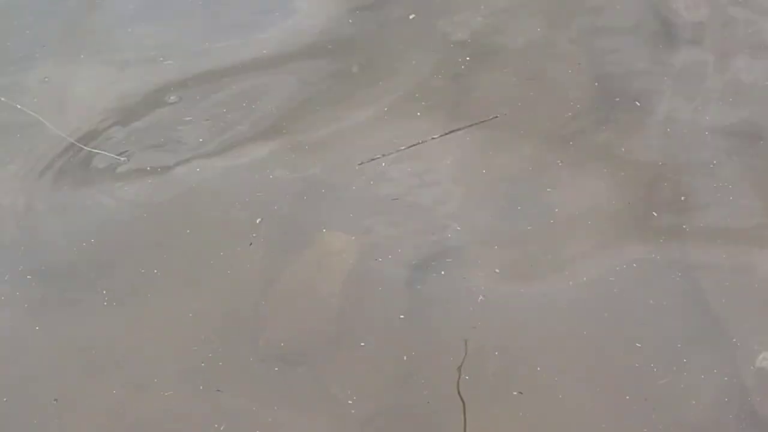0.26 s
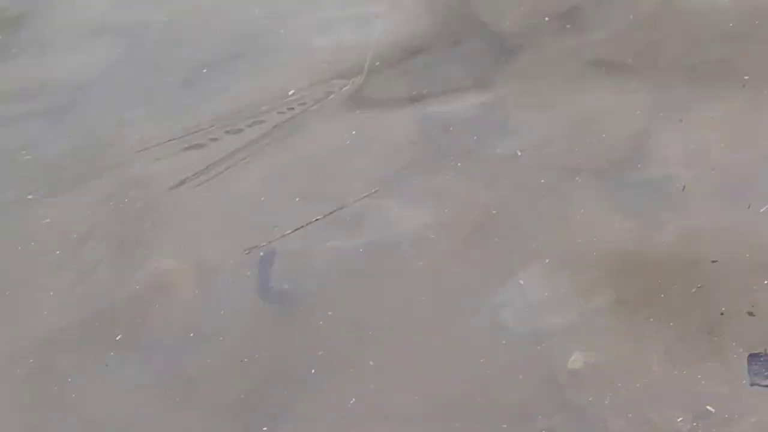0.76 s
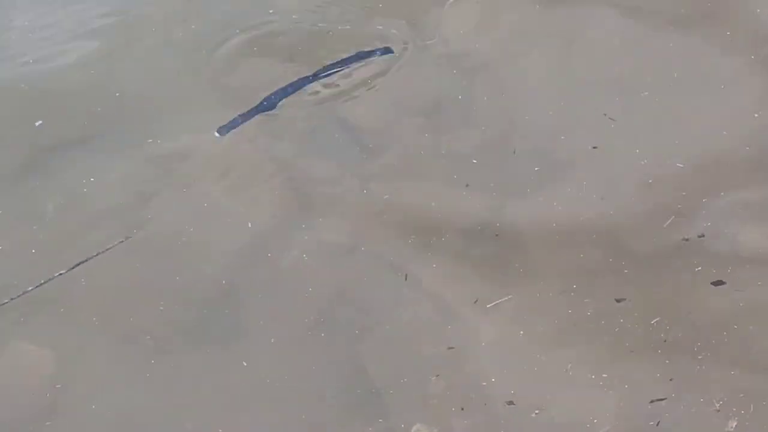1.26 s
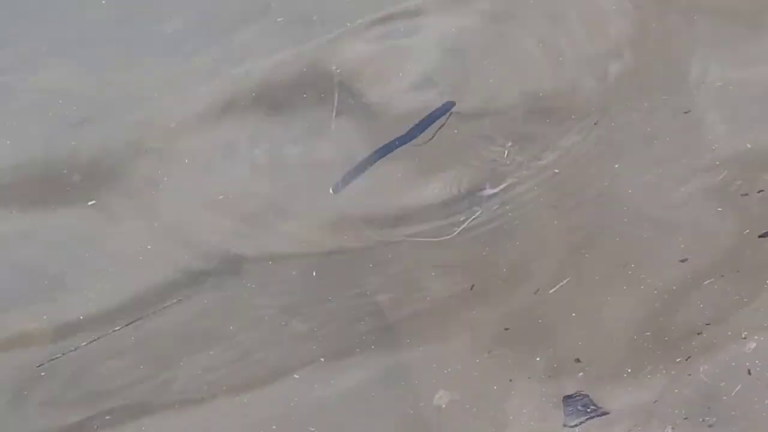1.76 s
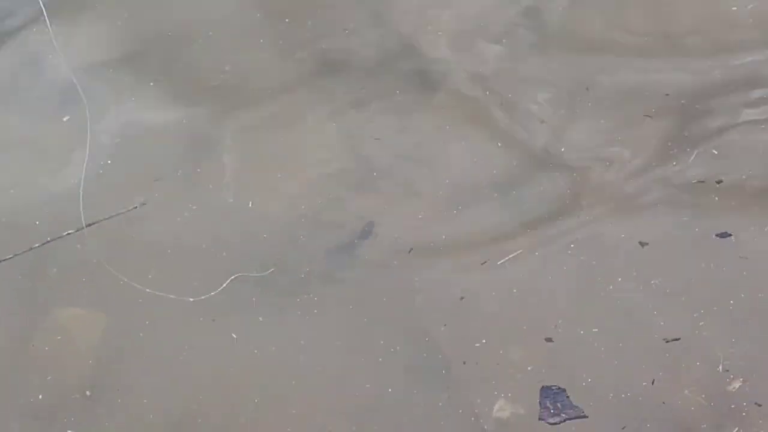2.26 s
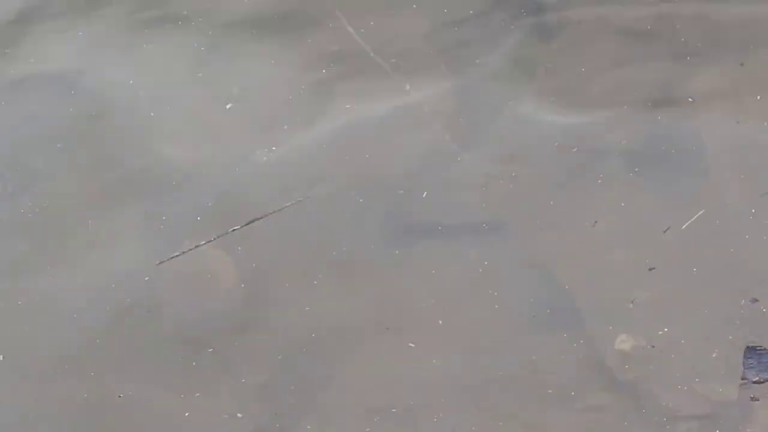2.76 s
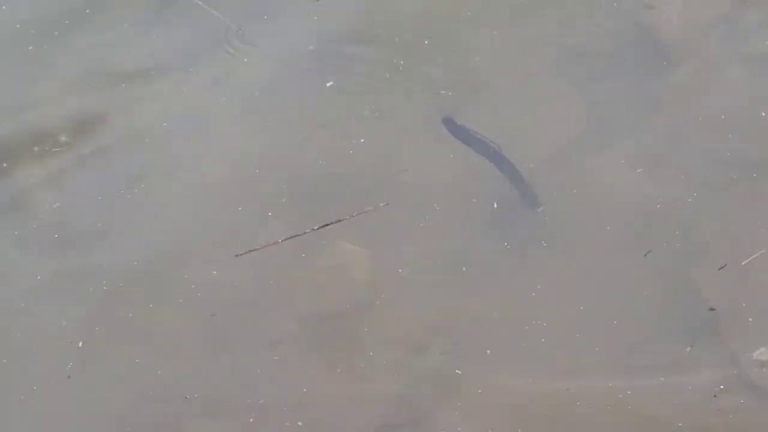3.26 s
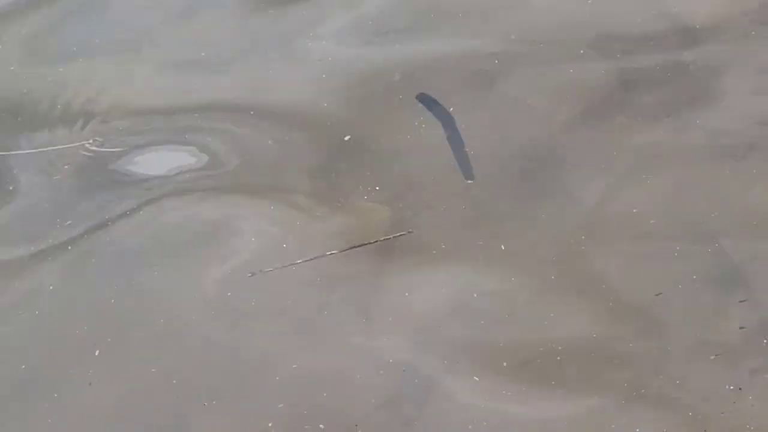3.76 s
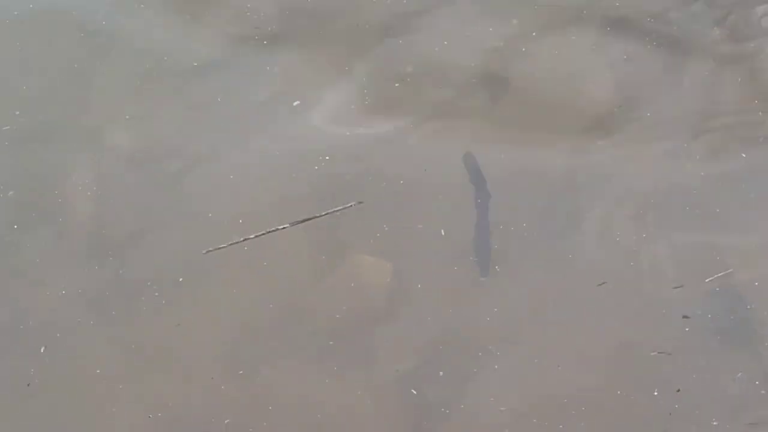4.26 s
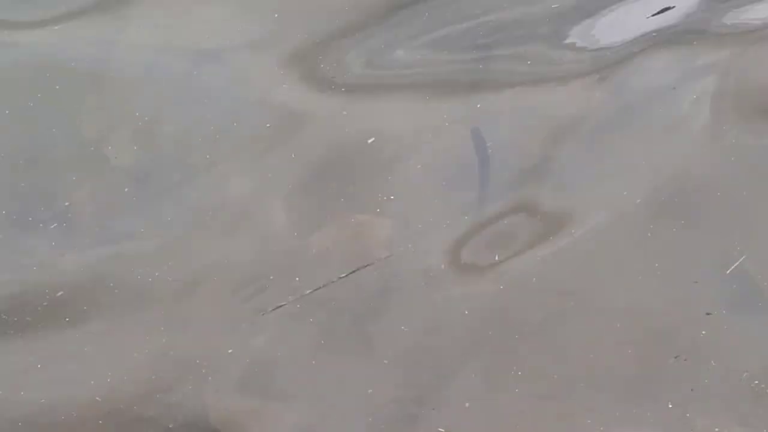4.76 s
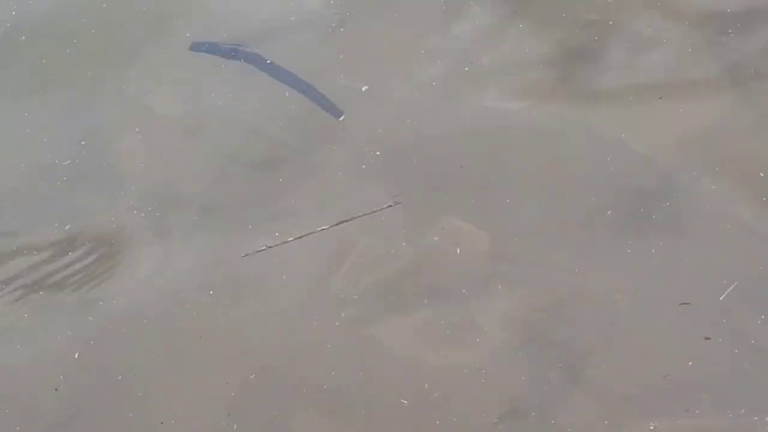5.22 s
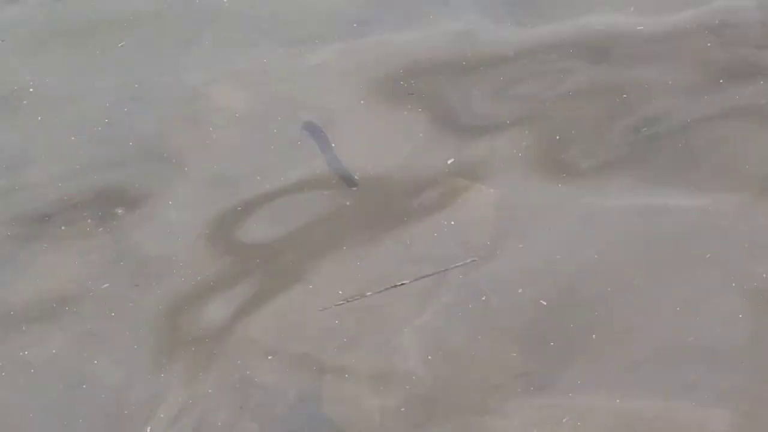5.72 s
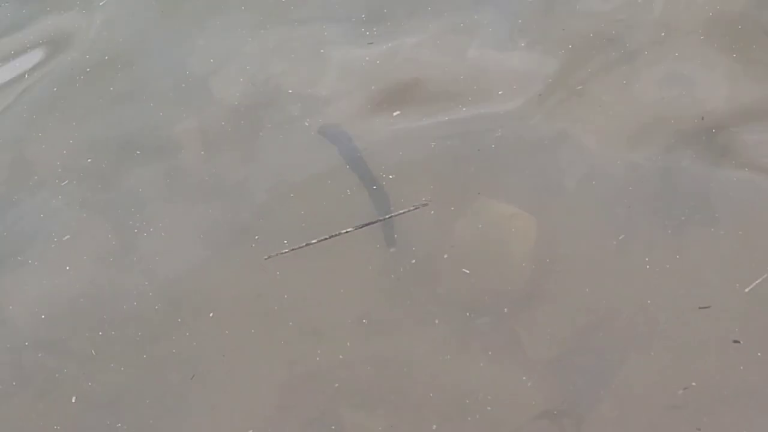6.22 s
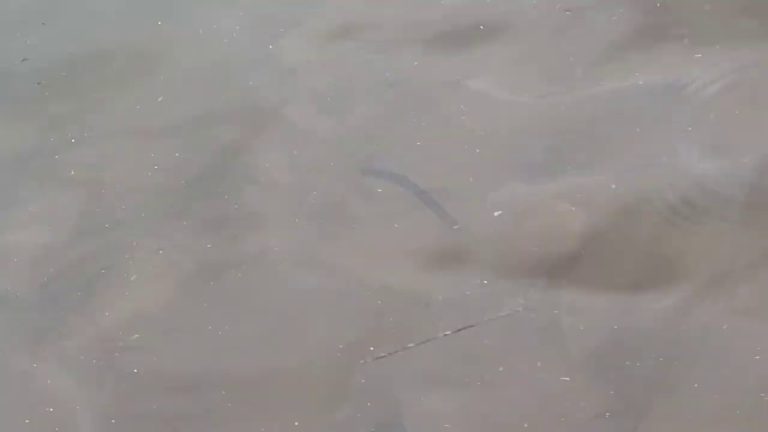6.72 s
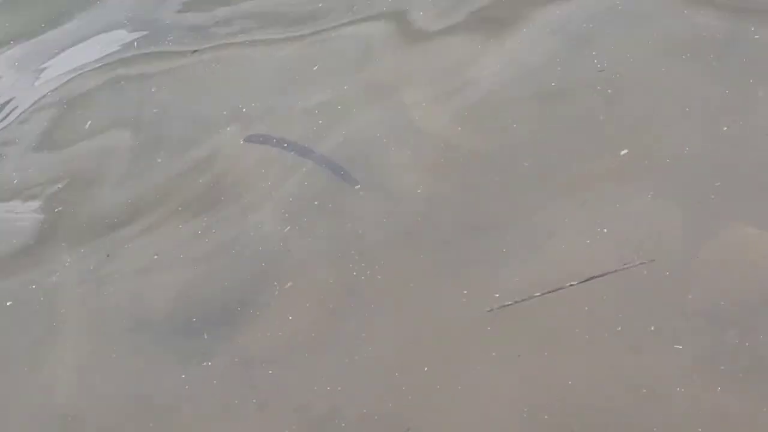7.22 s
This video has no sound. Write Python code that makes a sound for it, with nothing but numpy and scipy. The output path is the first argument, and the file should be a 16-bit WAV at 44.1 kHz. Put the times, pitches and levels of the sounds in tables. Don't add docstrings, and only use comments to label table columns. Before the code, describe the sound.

Shallow water laps irregularly near the microphone: round bubble plops, small wet drips and crisp splash ticks, separated by near-quiet lulls. Wind rumbles in short uneven lumps, different in left and right. A small bird with a light open-air echo chirps at first, rests, then gives five slow-spaced descending whistles and a quick closing phrase. Two stronger splashes stand out in the second half.

```python
import sys
import numpy as np
from scipy import signal
from scipy.fft import rfft, irfft, next_fast_len
from scipy.io import wavfile
from scipy.ndimage import uniform_filter1d

SR = 44100
rng = np.random.default_rng(int(sys.argv[2]) if len(sys.argv) > 2 else 0)


def to_linear_factor(level_db):
    exponent = np.asarray(level_db, float) / 20
    return 10 ** exponent


def persist_wave(psi):
    counts = np.round(np.clip(psi, -1, 1) * 32767).astype(np.int16)
    wavfile.write(sys.argv[1], SR, np.atleast_2d(counts).T)


N = 330044

# (time [s], gurgle level [dB], foam level [dB])
SURGES = [(0.0, -55.5, -64), (0.23, -68, -76.5), (0.44, -81, -73.5), (0.58, -65.5, -77), (0.79, -65.5, -72),
          (1.08, -60, -61.5), (1.27, -60, -67), (1.5, -71.5, -73), (1.67, -83.5, -82.5), (1.89, -70, -70),
          (2.04, -58.5, -63), (2.15, -59, -66), (2.46, -68, -76), (2.67, -72, -78), (2.91, -65, -72),
          (3.1, -56.5, -61.5), (3.27, -66, -69.5), (3.48, -73.5, -82.5), (3.71, -83.5, -78.5),
          (3.83, -70.5, -75), (4.08, -59.5, -66), (4.19, -64, -71.5), (4.35, -65, -76.5), (4.54, -83, -82),
          (4.77, -73.5, -84), (4.89, -57.5, -65.5), (5.04, -42.5, -55.5), (5.1, -45, -59.5),
          (5.23, -58, -62.5), (5.33, -73.5, -72.5), (5.5, -65, -71.5), (5.73, -67, -63), (5.83, -52.5, -54),
          (5.94, -49.5, -57.5), (6.0, -44.5, -53.5), (6.06, -49, -55.5), (6.19, -59.5, -67.5),
          (6.39, -69.5, -73.5), (6.75, -62, -70.5), (6.98, -53.5, -60), (7.08, -57.5, -59.5),
          (7.29, -70, -73), (7.48, -80, -75.5)]
# (time [s], delay of the left port [samples])
BEARINGS = [
    (0, 12),
    (1.5, 8.5),
    (2.5, 14.5),
    (4.3, 16),
    (4.6, -11),
    (5.2, -7.5),
    (5.8, -4.5),
    (6.2, 11.5),
    (6.7, -14),
    (7.2, 10),
]
# (time [s], peak level [dB], pitch [Hz], left-right difference [dB])
PLOPS = [(0.096, -36, 660, 2), (0.638, -39, 456, 0), (0.924, -36.5, 1150, -5), (0.985, -37, 961, 4),
         (1.05, -31.5, 1110, -6), (1.094, -45, 331, 1.5), (1.094, -28, 860, -5), (1.163, -35.5, 427, 1),
         (1.459, -32.5, 920, -3), (1.843, -43, 347, -7), (1.987, -35.5, 580, 3), (2.104, -47, 616, -1.5),
         (2.316, -37.5, 755, -9), (2.668, -42, 680, 2), (3.06, -30, 780, -5), (4.036, -42.5, 330, 2),
         (4.304, -36.5, 396, -1.0), (4.747, -46.5, 895, 1), (4.929, -27.5, 407, -0.5),
         (4.972, -24, 507, -5), (5.021, -19, 1560, -5), (5.074, -33.5, 690, -10), (5.125, -32, 470, -5),
         (5.449, -39, 406, -0.5), (5.506, -37.5, 786, 1), (5.726, -34, 1310, -5), (5.769, -32, 920, 0),
         (5.817, -34, 1400, -10), (5.853, -26, 1670, -5), (5.899, -26, 604, -3), (5.94, -25.5, 876, -4),
         (6.554, -37.5, 422, 0), (6.633, -35, 388, 0), (6.779, -37.5, 720, 0.0), (6.801, -28.5, 1290, -4),
         (6.866, -34, 620, -1), (6.901, -43, 720, -6), (6.921, -30, 510, 1), (6.941, -24, 915, -1),
         (7.011, -31, 610, 0), (7.093, -33, 454, -1.0), (7.208, -36, 1750, -4)]
# (time [s], peak level [dB], pitch [Hz])
DROPS = [(0.64, -39, 1750), (0.742, -42, 3180), (0.882, -32, 1960), (0.9247, -25, 2620), (1.219, -33, 1900),
         (1.942, -31, 1830), (2.0897, -40, 3030), (2.41, -40.5, 2850), (3.0091, -36, 3000),
         (3.031, -33.5, 2300), (3.0603, -32.5, 3520), (3.1655, -33.5, 2700), (4.1104, -35, 2140),
         (5.2011, -26, 2080), (5.5044, -33, 1700), (7.0115, -35.5, 1760), (7.1606, -32, 1840)]
# (time [s], peak level [dB], centre frequency [Hz], left-right difference [dB])
TICKS = [(0.0847, -43, 9200, -4), (0.0977, -29.5, 5370, -1.5), (0.6055, -43, 11500, 4),
         (0.6404, -40, 5540, 3), (0.7345, -41, 8200, 2.0), (0.7372, -37, 7700, 6),
         (1.0208, -43, 12100, -1.0), (1.048, -32, 6840, -3), (1.1797, -34, 5700, 0),
         (1.9395, -43, 4950, 0.5), (2.0154, -37, 4620, 2), (2.1452, -40, 6270, -6), (2.41, -44, 4860, 2),
         (3.0031, -37.5, 8300, -0.5), (3.0969, -39, 11600, -9), (3.2685, -45, 7030, 1.5),
         (4.124, -50, 10200, -5), (4.1628, -35.5, 5300, -3), (4.8843, -40, 8700, 10),
         (4.938, -38, 4270, 3.0), (4.941, -32.5, 8930, 1.5), (4.9691, -30.5, 5300, 0.0),
         (5.0763, -28, 4430, 1), (5.1408, -23, 5100, 3), (5.2265, -44, 5050, -1.0),
         (5.7663, -36, 5700, 0.5), (5.8237, -35, 11600, 1.0), (5.8546, -22.5, 4730, -4),
         (5.901, -37, 7400, 0.5), (5.981, -31.5, 9000, -7.5), (6.0059, -19.5, 5330, 2),
         (6.1265, -51, 5650, -1.0), (6.1243, -32.5, 6900, -4), (7.0473, -34, 4530, 2),
         (7.2105, -42, 4830, 0.0), (7.266, -42, 5200, -2.0)]
# (time [s], length [s], start pitch [Hz], end pitch [Hz], level [dB])
GLUGS = [(0.866, 0.023, 806, 1570, -46), (2.659, 0.057, 664, 730, -52), (2.721, 0.032, 840, 1390, -59),
         (3.937, 0.024, 665, 854, -51.5), (4.811, 0.058, 824, 1170, -54.5), (5.385, 0.1, 348, 520, -61),
         (5.509, 0.031, 602, 1236, -44.5), (5.524, 0.086, 346, 479, -49), (5.548, 0.02, 850, 1610, -51),
         (5.575, 0.026, 550, 854, -50), (5.811, 0.017, 894, 1750, -39), (6.393, 0.048, 623, 624, -47),
         (6.439, 0.034, 697, 1266, -56.5), (7.297, 0.037, 460, 790, -53.5)]
# (frequency [Hz], gain [dB])
GURGLE_SPECTRUM = [(200, 0.5), (320, -5), (500, -1.5), (1200, 3.5), (2000, 3.5), (3500, -21.5)]
# (frequency [Hz], gain [dB])
FOAM_SPECTRUM = [(600, 7), (2000, 1), (4500, 4), (7000, 6), (8600, 5), (10500, 5.5), (12500, 11),
                 (15800, 8), (16200, -20)]
# (time [s], left port level [dB], right port level [dB])
GUSTS = [(0.0, -35, -58), (0.03, -37, -54), (0.11, -41, -46), (0.21, -63, -79), (0.42, -48, -54),
         (0.58, -55, -82), (0.71, -37, -45), (0.85, -49, -80), (0.93, -46.5, -44), (1.04, -42.5, -72),
         (1.19, -70, -79), (1.34, -42.5, -54), (1.51, -52.5, -51.5), (1.65, -60, -79), (1.73, -53, -72),
         (1.87, -41.5, -68), (1.91, -49, -77), (2.0, -45, -46), (2.05, -58, -77), (2.17, -44, -48),
         (2.51, -72.5, -89), (2.72, -40, -51), (2.93, -57.5, -85), (3.0, -35, -38), (3.07, -57, -75),
         (3.18, -30.5, -33), (3.24, -49, -71), (3.36, -41.5, -36.5), (3.42, -41, -45), (3.57, -50, -82),
         (3.66, -48.5, -77), (3.69, -32, -39), (3.74, -34.5, -34), (3.8, -52, -77), (3.88, -45, -39),
         (4.02, -40.5, -60), (4.05, -36.5, -35), (4.1, -34, -34), (4.16, -59, -74), (4.2, -39, -43),
         (4.24, -34.5, -47), (4.28, -45.5, -67), (4.32, -35, -35), (4.39, -43, -64), (4.45, -48, -60),
         (4.54, -28, -29), (4.58, -44, -53), (4.61, -45, -42), (4.84, -54, -76), (5.04, -44, -50),
         (5.13, -60, -65), (5.27, -38, -45), (5.39, -57, -64), (5.54, -48, -47.5), (5.86, -46.5, -57),
         (5.91, -39.5, -45), (5.97, -51, -54), (6.02, -27, -37), (6.06, -39, -38), (6.1, -47, -63),
         (6.16, -39, -37), (6.38, -62.5, -75), (6.75, -56, -64), (6.79, -32.5, -36), (6.89, -42, -57),
         (6.92, -38, -42), (7.04, -56.5, -78), (7.18, -37.5, -40), (7.24, -43.5, -46.5), (7.32, -54, -66),
         (7.36, -44, -51), (7.48, -57.5, -88)]
# (frequency [Hz], density [dB per Hz])
WIND_SPECTRUM = [(8.8, -55), (15, -10.5), (49, 5), (70, 7), (162, -7.5), (196, -11), (367, -25.5),
                 (425, -26), (500, -35), (650, -57), (1100, -120)]
# (time [s], pitch [Hz], level [dB])
LONG_WHISTLES = [
    [(4.31, 2597, -74), (4.328, 2607, -70), (4.478, 2543, -45), (4.505, 2473, -67)],
    [(4.74, 2735, -89), (4.788, 2663, -52), (4.936, 2593, -44), (4.975, 2480, -44)],
    [(5.225, 2290, -70.5), (5.253, 2664, -45.5), (5.403, 2543, -37.5), (5.44, 2516, -49)],
    [(5.64, 2671, -69), (5.674, 2682, -45.5), (5.826, 2598, -38), (5.86, 2420, -50)],
    [(6.08, 2540, -56), (6.12, 2634, -42.5), (6.274, 2535, -41), (6.318, 2430, -53)],
]
# (time from onset [s], pitch [Hz], level [dB])
SYLLABLE_SHAPES = [
    [(0, 3850, -68), (.014, 3880, -39), (.03, 3800, -54), (.04, 3400, -51), (.055, 2700, -41.5),
     (.066, 2560, -36), (.075, 2480, -73)],
    [(0, 4250, -51), (.011, 3700, -48.5), (.023, 2950, -45.5), (.033, 2580, -38.5), (.054, 2270, -43),
     (.06, 2220, -56)],
    [(0, 1750, -61), (.013, 2030, -49), (.03, 2050, -50.5), (.05, 2030, -49)],
    [(0, 3120, -63), (.04, 3500, -57), (.065, 3700, -66.5), (.13, 3750, -71)],
    [(0, 2350, -71), (.02, 2520, -59), (.042, 2300, -60)],
    [(0, 4650, -45), (.018, 4300, -61), (.035, 3200, -46.5), (.05, 3000, -42.5), (.09, 2950, -48),
     (.096, 3050, -56)],
    [(0, 1700, -57), (.024, 2030, -54), (.042, 1650, -51), (.052, 1950, -50), (.068, 2450, -39.5),
     (.09, 2700, -48)],
    [(0, 2080, -66), (.022, 1850, -64), (.05, 1550, -60)],
]
# (shape number, time [s])
SYLLABLES = [(3, .352), (4, .57), (7, .578), (5, .72), (2, 1.396), (1, 1.492), (2, 1.592), (1, 1.708),
             (2, 1.808), (0, 6.45), (0, 6.597), (0, 6.762), (6, 6.876), (6, 7.027)]
# (frequency [Hz], density [dB per Hz])
WASH_SPECTRUM = [(120, -48), (200, -8.5), (652, -21), (909, -10), (2290, -11.5), (2600, -9), (3310, -29.5),
                 (11600, -23), (15600, -23.5), (16500, -62)]


def water():
    gurgle = swarm(count=4000, column=1, low_hz=261.4, high_hz=3200, cycles=12.37, rise=0.6,
                   spread_db=4.5, scatter=7.0, size=800)
    foam = swarm(count=14000, column=2, low_hz=2354, high_hz=16800, cycles=5.1, rise=0.022,
                 spread_db=5.5, scatter=14.0, size=120)
    near = to_linear_factor(8.5) * coloured(gurgle, GURGLE_SPECTRUM) + to_linear_factor(5.5) * coloured(foam, FOAM_SPECTRUM)
    near = near + plops() + drops() + ticks() + glugs()
    return near + to_linear_factor(-5) * echoes(near, t60=0.062, start_s=0.0019)


def swarm(count, column, low_hz, high_hz, cycles, rise, spread_db, scatter, size):
    when, pitch, life, big, side = rng.random((count, 5)).T
    s = when * N / SR
    hz = low_hz * (high_hz / low_hz) ** pitch
    db = -spread_db * np.log(big + 0.0093)
    late = curve(BEARINGS, 1, s) + scatter * (2 * side - 1)
    t60 = cycles * (0.29 + 1.46 * life ** 2) / hz
    pan_db = 4.1 * (life - side)
    pockets = rings(s, db, hz, t60, rise * life, pan_db, late, 0.26 * t60, size)
    return evened(pockets) * to_linear_factor(curve(SURGES, column, np.arange(N) / SR))


def plops():
    s, db, hz, pan_db = np.transpose(PLOPS)
    late = curve(BEARINGS, 1, s)
    return rings(s, db + 3.0, hz, t60=9.7 / hz, rise=0.326, pan_db=pan_db, late=late, soft_s=0.001, size=1800)


def drops():
    s, db, hz = np.transpose(DROPS)
    return splash((s, db, hz, 0 * s), low=0.74, high=1.063, t60=0.0061, parts=2)


def ticks():
    s, db, hz, pan_db = np.transpose(TICKS)
    return splash((s, db - 4.0, hz, pan_db), low=0.533, high=2.51, t60=0.0034, parts=6)


def glugs():
    out = np.zeros(N)
    for s, span, start_hz, end_hz, db in GLUGS:
        bend = (0.657 * span, (start_hz + end_hz) * 0.47, db - 6.5)
        glide(out, [(0, start_hz, db), bend, (span, end_hz, db - 1.0)], s)
    return out


def splash(rows, low, high, t60, parts):
    s, db, hz, pan_db = (np.repeat(v, parts) for v in rows)
    spread, jitter = rng.random((len(s), 2)).T
    hz = np.minimum(hz * low * (high / low) ** spread, 15500)
    late = curve(BEARINGS, 1, s)
    return rings(s - 0.001 + 0.002 * jitter, db, hz, t60, 0.1, pan_db, late, soft_s=0.0012, size=500)


def rings(s, db, hz, t60, rise, pan_db, late, soft_s, size):
    t = np.arange(size) / SR
    settings = (s, db, hz, t60, rise, pan_db, late, soft_s)
    s, db, hz, t60, rise, pan_db, late, soft_s = (np.broadcast_to(v, np.shape(s))[:, None] for v in settings)
    turns = hz * (t + rise * t ** 2 / (2 * t60))
    swell = np.sin(np.pi / 2 * np.minimum(t / soft_s, 1)) ** 2
    decay = to_linear_factor(db - 60 * np.maximum(t - soft_s, 0) / t60)
    ring = swell * decay * np.sin(2 * np.pi * turns)
    out = np.zeros((2, N))
    for port, sign in enumerate((1, -1)):
        start = np.maximum(s * SR + sign * late / 2, 0).astype(int)
        at = start + np.arange(size)
        heard = ring * to_linear_factor(sign * pan_db / 2)
        out[port] = np.bincount(at.ravel(), heard.ravel(), N + size)[:N]
    return out


def wind():
    t = np.arange(N) / SR
    eddies = coloured(rng.standard_normal((2, N)) * to_linear_factor(5.6 * lumps(0.012)), WIND_SPECTRUM)
    power = uniform_filter1d(uniform_filter1d(eddies ** 2, 1500), 1500)
    steady = eddies / np.sqrt(power + 1e-9)
    gust_db = np.array([curve(GUSTS, 1, t), curve(GUSTS, 2, t)])
    return steady * to_linear_factor(gust_db + 0.53)


def bird():
    song = np.zeros(N)
    for rows in LONG_WHISTLES:
        glide(song, rows, 0)
    for shape, s in SYLLABLES:
        glide(song, SYLLABLE_SHAPES[shape], s)
    bright = evened(np.diff(song, 2, prepend=(0, 0))) * song.std()
    leaves = to_linear_factor(-9) * echoes(bright[None], t60=0.15, start_s=0.0019)
    far_bank = to_linear_factor(-17) * echoes(bright[None], t60=0.5, start_s=0.01)
    smear = leaves + far_bank
    slap = to_linear_factor(-28) * np.roll(bright, round(0.168 * SR))
    return song + slap + 1.03 * smear[0] + 0.12 * smear


def glide(mix, rows, start_s):
    t = np.arange(rows[0][0], rows[-1][0], 1 / SR)
    tone = np.sqrt(2) * np.sin(2 * np.pi * np.cumsum(curve(rows, 1, t)) / SR)
    fade = signal.windows.tukey(len(t), 400 / len(t))
    mix[round((start_s + t[0]) * SR):][:len(t)] += tone * to_linear_factor(curve(rows, 2, t)) * fade


def echoes(x, t60, start_s):
    t = np.arange(SR // 2) / SR
    signs = rng.choice([-1.0, 1.0], (2, len(t)))
    present = rng.random((2, len(t))) < 0.05
    taps = signs * present * to_linear_factor(-60 * t / t60) * (t > start_s)
    return signal.fftconvolve(x, taps / np.linalg.norm(taps[0]), axes=1)[:, :N]


def wash():
    swell_db = 0.63 * (curve(SURGES, 2, np.arange(N) / SR) + 72)
    hiss = evened(coloured(rng.standard_normal((2, N)), WASH_SPECTRUM))
    return hiss * to_linear_factor(-65.5 + swell_db + 0.63 * lumps(0.028))


def lumps(span_s):
    size = max(round(span_s * SR), 2)
    return evened(uniform_filter1d(uniform_filter1d(rng.standard_normal((2, N)), size), size))


def coloured(x, spectrum):
    size = next_fast_len(N + 4096)
    gain = to_linear_factor(read(spectrum, np.fft.rfftfreq(size, 1 / SR)))
    return irfft(rfft(x, size) * gain, size)[..., :N]


def read(points, hz):
    f, value = np.transpose(points)
    return np.interp(np.log(hz + 1), np.log(f + 1), value)


def curve(rows, column, s):
    rows = np.asarray(rows)
    return np.interp(s, rows[:, 0], rows[:, column])


def evened(x):
    return x / np.sqrt(np.mean(x ** 2) + 1e-20)


def scene():
    return water() + wind() + bird() + wash()


def low_pass(x):
    return signal.sosfilt(signal.butter(12, 16840, fs=SR, output="sos"), x)


def record(dry):
    return low_pass(dry)


dry = scene()
out = record(dry)
persist_wave(out)
```